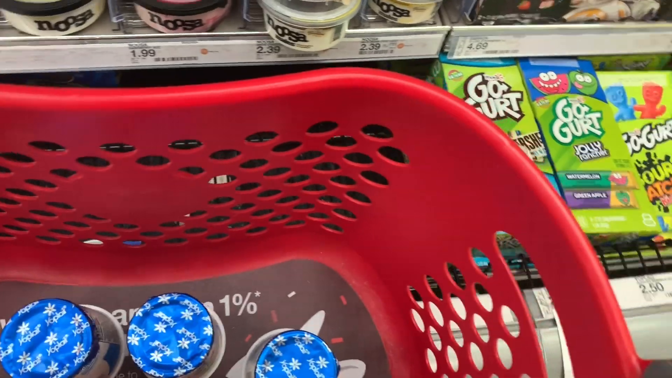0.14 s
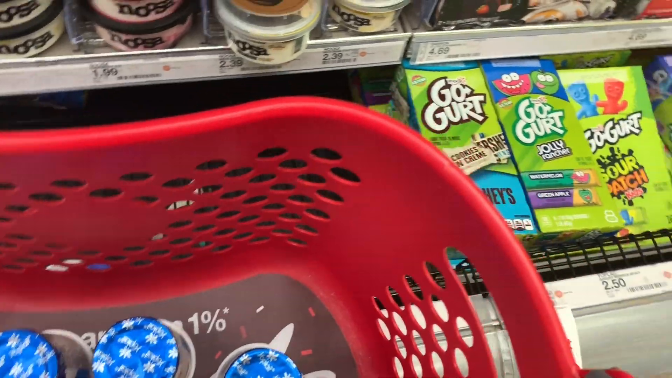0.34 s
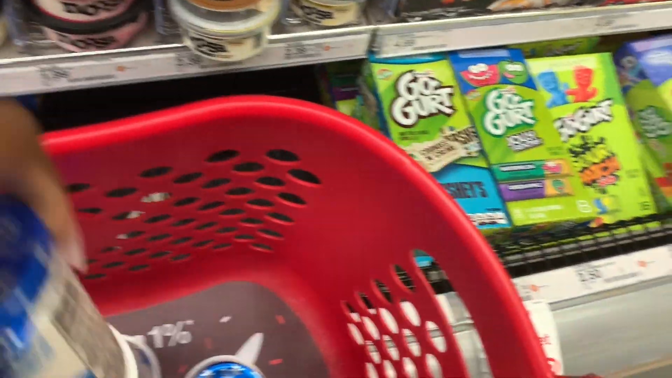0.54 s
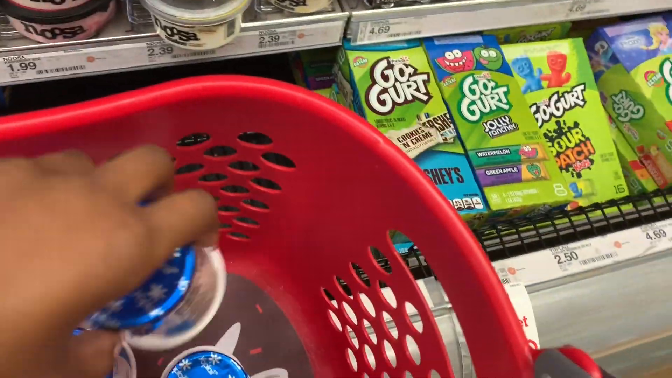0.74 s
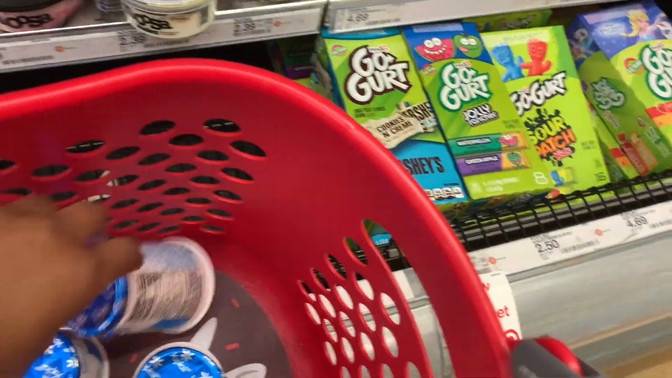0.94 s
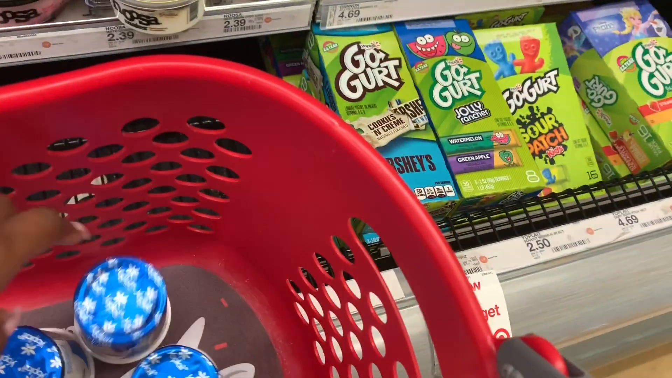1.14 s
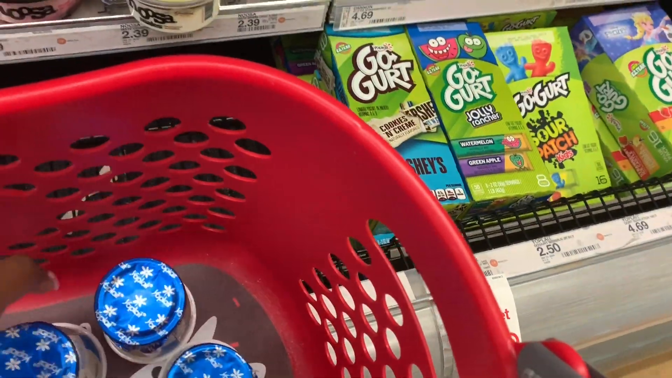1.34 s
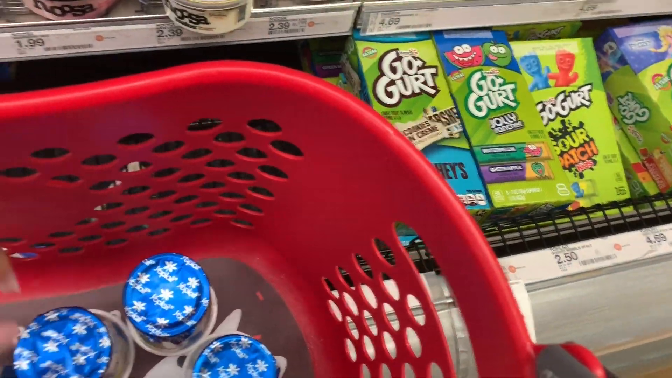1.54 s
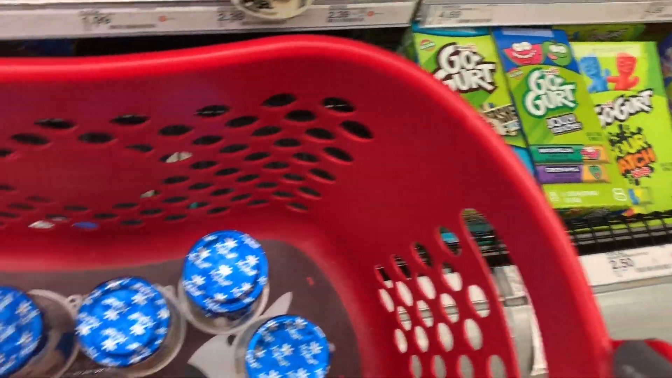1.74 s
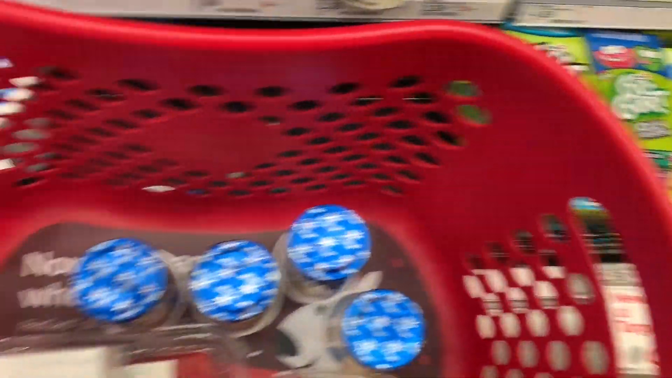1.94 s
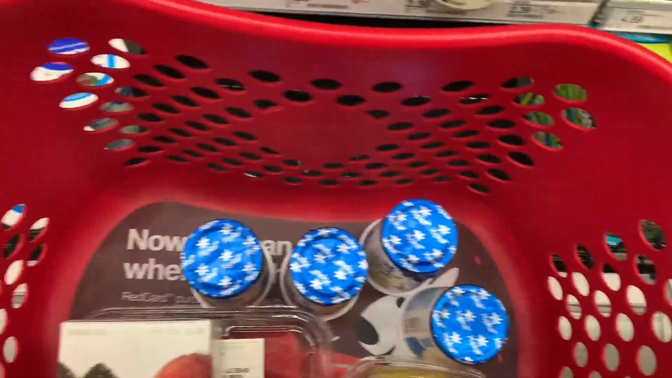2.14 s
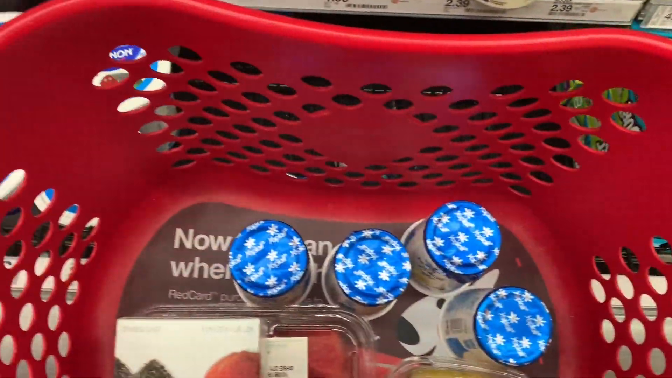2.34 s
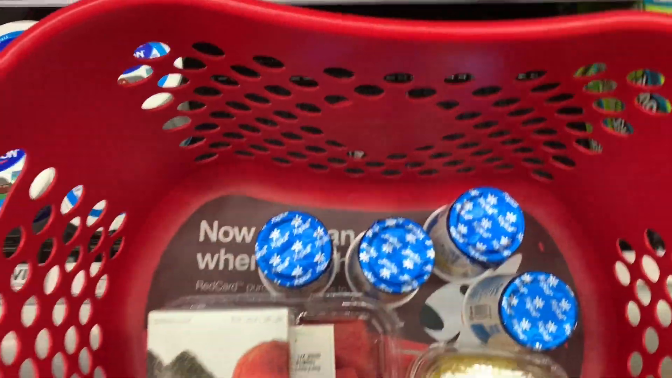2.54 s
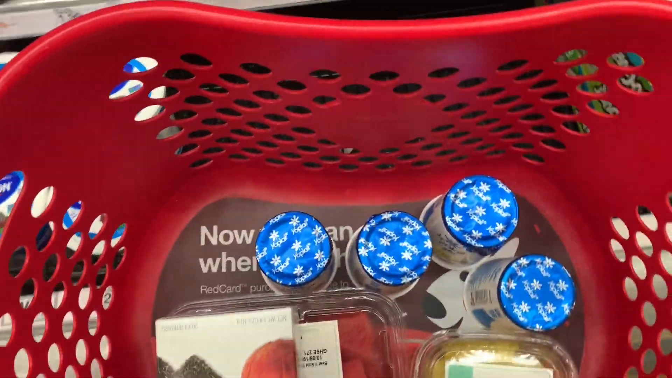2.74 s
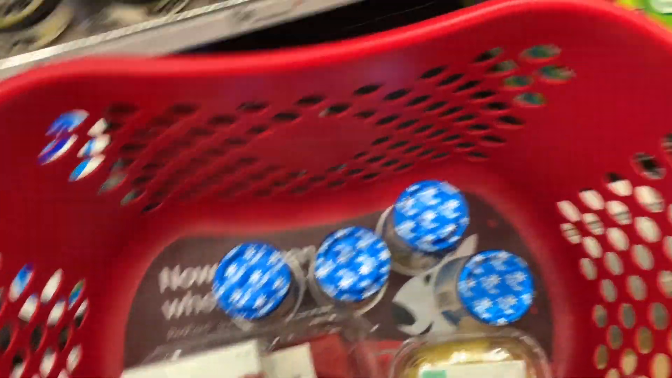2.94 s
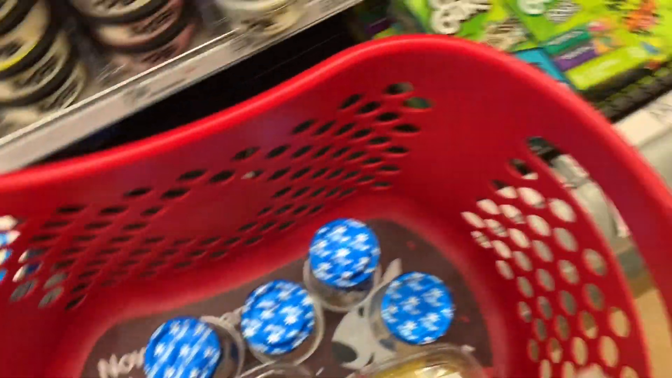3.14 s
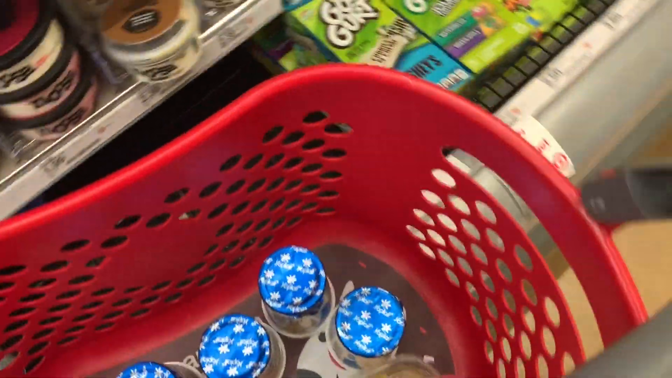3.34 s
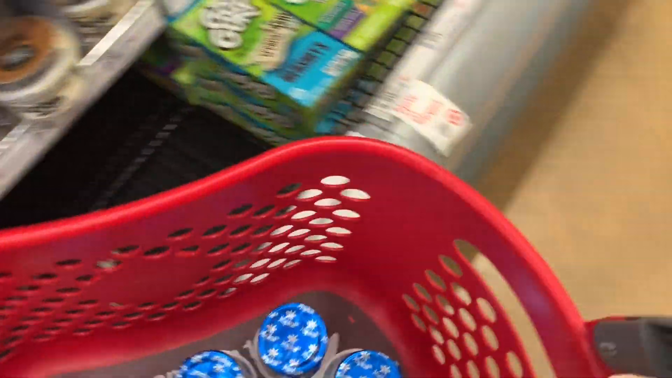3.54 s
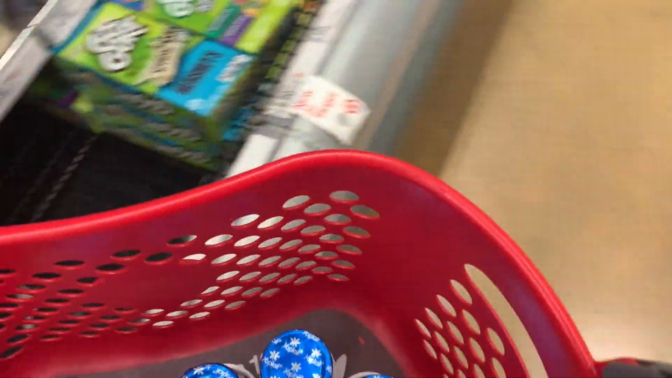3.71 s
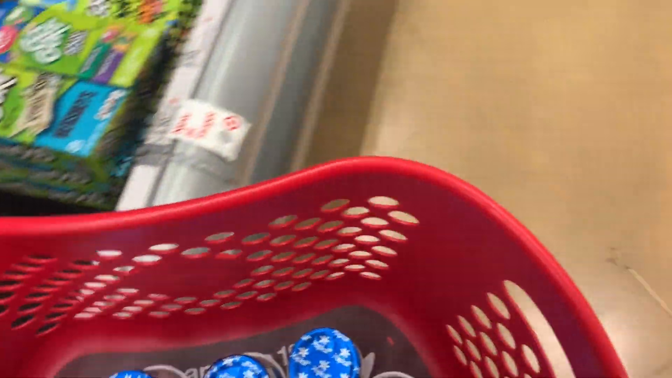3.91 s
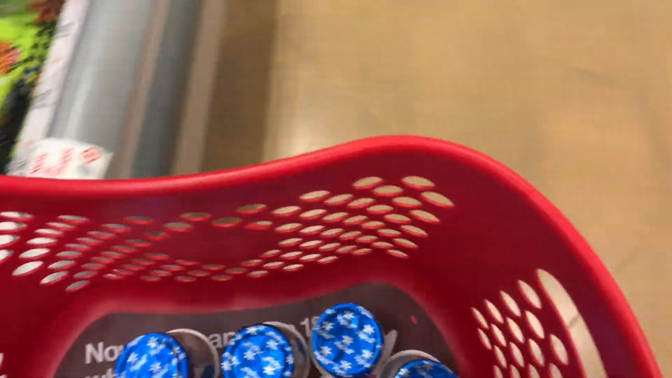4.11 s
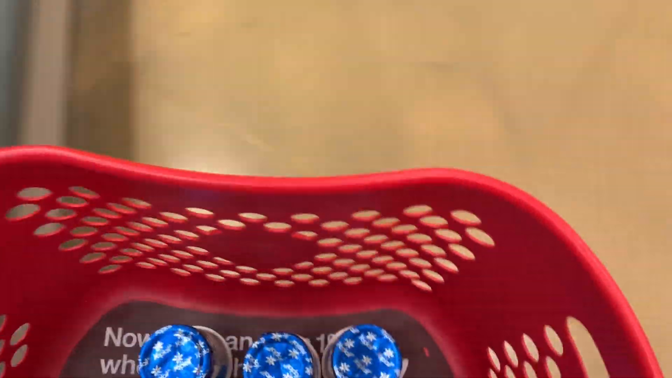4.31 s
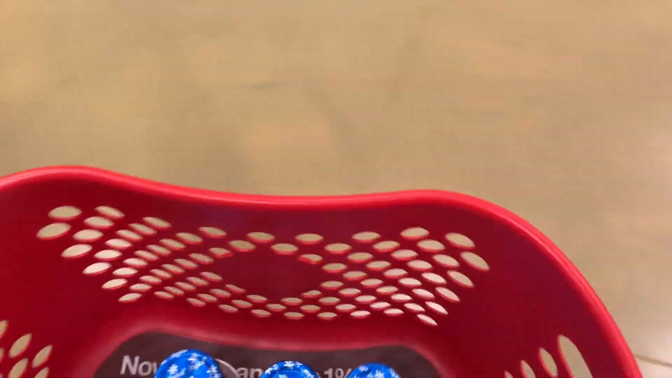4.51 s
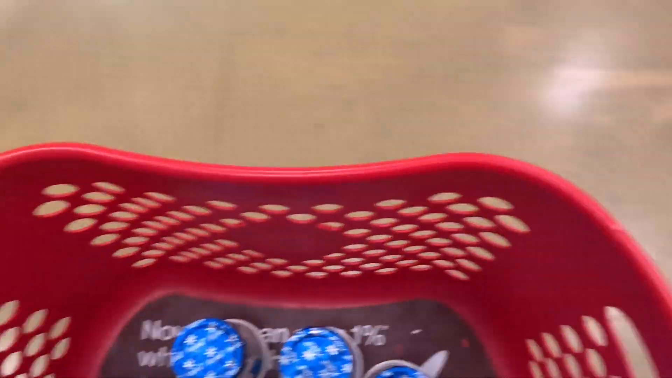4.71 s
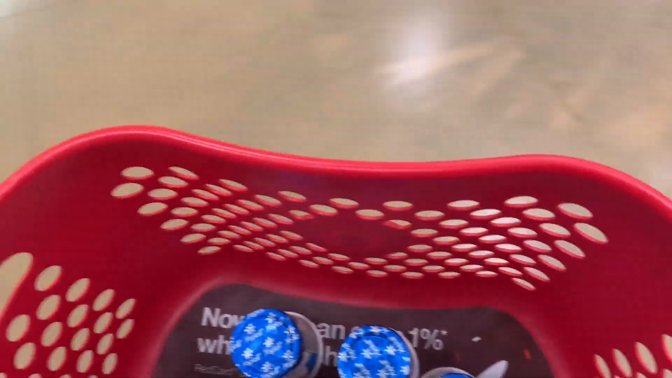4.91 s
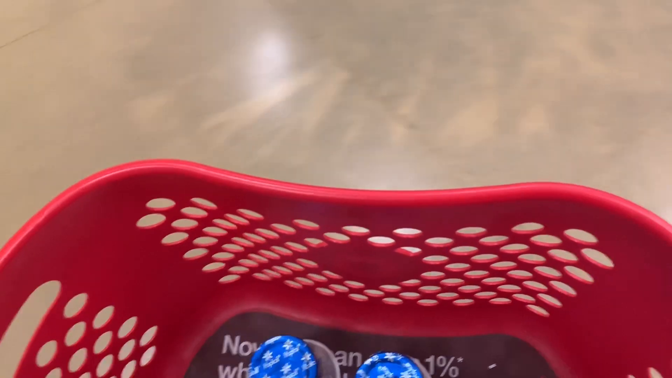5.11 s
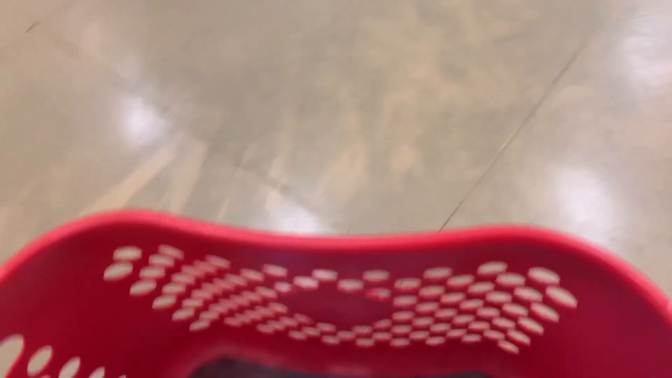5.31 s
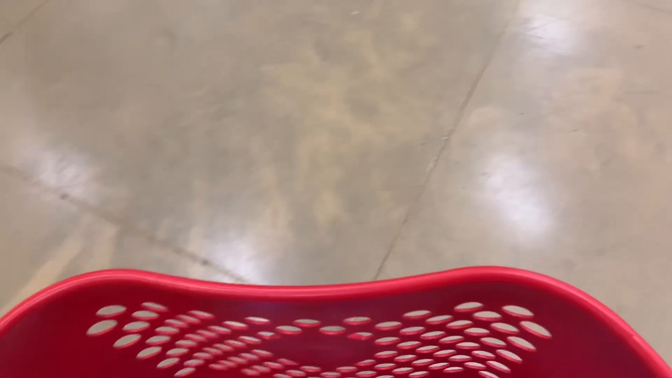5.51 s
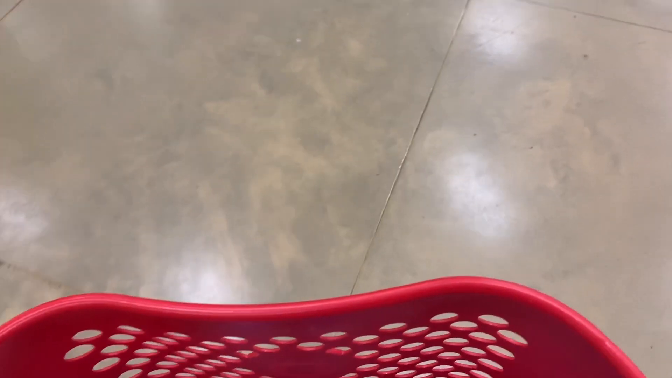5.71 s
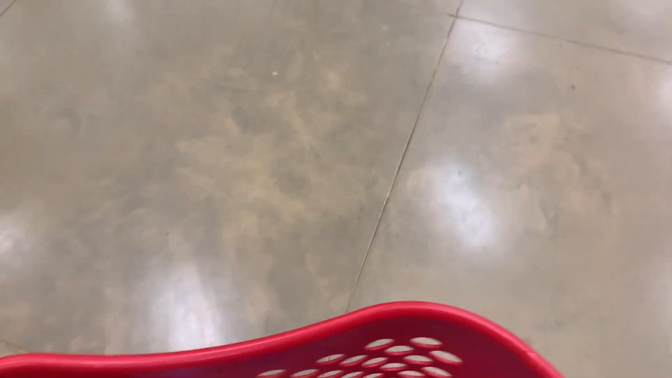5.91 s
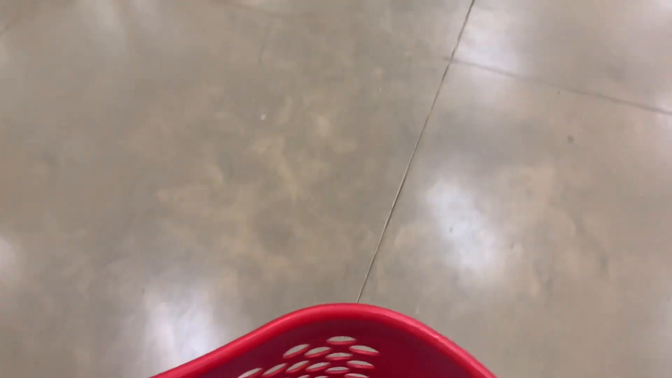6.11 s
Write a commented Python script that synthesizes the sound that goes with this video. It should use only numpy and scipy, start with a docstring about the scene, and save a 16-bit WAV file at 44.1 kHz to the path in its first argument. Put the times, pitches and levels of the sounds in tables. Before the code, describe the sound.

Thin plastic cups rustle and pop close by, then one lands in a plastic shopping basket with two sharp knocks and a brief rattle. Behind this runs the low hum and airy rush of a store's chilled shelves. After a pause, the basket's handle clacks several times and snaps into place. The drone gradually recedes, with a few light clicks, a soft scuff and faint far-off bustle at the end.

```python
"""Compressors hum and fans push air along the chilled shelves of a store, slightly louder in the right
channel. Close to the microphone, plastic cups rub, pop and crinkle in the hand; one is set down in a
plastic shopping basket, knocks twice and rattles against its neighbours. The basket is swung round, its
handle clacks and snaps in the pivots, and the refrigerators fall behind, uncovering the far bustle."""
import sys
import numpy as np
from scipy import signal
from scipy.fft import rfft, irfft, next_fast_len
from scipy.io import wavfile
from scipy.ndimage import uniform_filter1d, map_coordinates

SR = 44100
rng = np.random.default_rng(int(sys.argv[2]) if len(sys.argv) > 2 else 0)


def inscribe(sig):
    """Save sig as 16-bit PCM at rate SR to the path in sys.argv[1].

    A 1-D sig is mono; a 2-D sig holds one channel per row.
    Samples are clipped to [-1, 1] before scaling.
    """
    pcm = np.round(np.clip(np.atleast_2d(sig).T, -1, 1) * 32767)
    wavfile.write(sys.argv[1], SR, pcm.astype(np.int16))


N = 271646

# Mains hum, fan tone and cabinet drone along the aisle. Each row: time in seconds, relative level in dB.
MAINS_LEVEL = [(0, -47), (.8, -46), (1.2, -37), (2.0, -35), (2.8, -34), (3.5, -29), (3.8, -31), (4.3, -34),
               (4.6, -33), (5.2, -40), (6.16, -39)]
FAN_TONE_LEVEL = [(0, -31.5), (.6, -29), (1.85, -24.5), (2.6, -31.5), (2.95, -23), (3.33, -26),
                  (3.58, -20.5), (4.45, -35.5), (5.15, -35.5), (5.27, -26.5), (5.55, -33), (6.16, -19)]
DRONE_LEVEL = [(0, -23.5), (.9, -24.5), (1.85, -25), (2.75, -27.5), (3.25, -24), (4.5, -29), (5.3, -31.5),
               (6.16, -34.5)]
# The fans' rush along the aisle. Each row: time in seconds, relative duct and hiss levels in dB.
AIR_LEVELS = [(0, -30, -41.5), (1.4, -29, -41), (2.7, -29, -41), (3.5, -30.5, -41), (4.0, -32.5, -43),
              (4.6, -35, -44.5), (5.1, -37.5, -48), (6.16, -38.5, -48)]
# Cabinets, ducts, grilles, air hiss, building ventilation and far bustle, heard from the aisle.
# Each row: frequency in Hz, relative spectral level in dB.
DRONE_SPECTRUM = [(60, -120), (130, -35), (172, -10), (197, 0), (222, -6), (260, -16), (340, -40),
                  (700, -120)]
DUCT_SPECTRUM = [(90, -30), (150, -4), (245, 0), (310, -1), (350, -4), (400, -8), (460, -13), (530, -19),
                 (750, -40), (1500, -120)]
GRILLE_SPECTRUM = [(150, -120), (350, -12), (480, -1), (600, 0), (720, 1), (830, 0), (950, -9), (1100, -20),
                   (1500, -45), (3000, -120)]
HISS_SPECTRUM = [(500, -4), (1100, 0), (1650, 0), (2000, 1), (2400, -1), (2800, -6), (3300, -10.5),
                 (4100, -10), (4800, -16), (5800, -18), (7000, -19.5), (10500, -20), (12000, -26),
                 (13800, -22), (15200, -36)]
VENTILATION_SPECTRUM = [(10, -60), (25, -19), (35, -10), (45, -3), (75, -5), (90, 0), (110, 0), (150, -4),
                        (250, -25), (600, -120)]
BUSTLE_SPECTRUM = [(250, -26), (430, 4.5), (560, -1.5), (750, -20), (1000, -6), (1300, -12.5),
                   (1600, -21.5), (3000, -46)]
# How alike diffuse noise is at the two capsules. Each row: frequency in Hz, left-right correlation.
COHERENCE = [(60, 0.86), (150, 0.98), (380, 0.84), (950, 0.1), (2380, 0.011), (5980, 0.0067), (15000, 0.05)]

# Hand, cups and sleeve slide; lids crinkle; the load rattles; a far note and a scuff pass on the way out.
# Each row: start in seconds, length in seconds, relative level in dB.
RUBS = [(.21, 0.13, -46.5), (.385, 0.096, -49.5), (.585, 0.09, -49), (.76, 0.19, -54), (.85, 0.071, -39.5),
        (.99, 0.074, -41.5), (1.082, .04, -40), (2.415, 0.076, -46), (2.72, 0.17, -57), (3.42, 0.24, -45),
        (4.46, 0.35, -52.5), (5.275, 0.059, -52), (5.69, 0.15, -54), (5.91, 0.14, -58)]
CRINKLES = [(.352, 0.029, -37), (.708, 0.053, -40.5), (.843, 0.038, -30.5), (.872, 0.041, -36.5),
            (.916, 0.0089, -32), (1.082, 0.012, -27), (1.10, 0.019, -29)]
RATTLES = [(0.984, .07, -50), (1.182, .04, -41), (3.549, 0.04, -41)]
FAR_NOTE = [(5.63, 0.17, -33)]
SCUFFS = [(5.65, .11, -43.5)]
# Colour of the rubs and the scuff. Each row: frequency in Hz, relative spectral level in dB.
RUB_SPECTRUM = [(1500, -31), (3800, -2), (5500, -0.5), (7500, 1.5), (10000, 2.5), (13500, -8.5),
                (16000, -2)]
SCUFF_SPECTRUM = [(500, -14), (1500, -7), (2400, -9), (3500, -13), (9000, -16)]
# Cup rims scrape. Each row: start in seconds, length in seconds, level in dB, resonance in Hz.
RIM_SCRAPES = [(.878, .05, -44, 1500), (.884, .034, -33.5, 3550), (1.615, .055, -53, 4750),
               (5.695, .035, -47, 2050)]
# Close hits: cups pop, the basket is struck, its floor gives, thin plastic clicks, the handle catches.
# Each row: start in seconds, relative level in dB, centre frequency in Hz, 60 dB decay time in seconds.
CUP_POPS = [(0.3417, -34.5, 7100, 0.012), (0.3697, -29.5, 7640, 0.013), (0.369, -28, 9930, 0.0091),
            (.3792, -35, 12900, .01), (0.379, -34.5, 7000, .01), (1.1187, -24.5, 10000, .006),
            (1.129, -23, 6100, 0.012), (1.128, -28, 13600, 0.011)]
BASKET_KNOCKS = [(0.947, -28, 1400, 0.049), (0.9556, -10, 1190, 0.0095), (0.9585, -9.5, 373, 0.027),
                 (.965, -22, 650, 0.018), (.982, -29.5, 776, 0.12), (1.1238, -17.5, 1240, 0.027),
                 (1.128, -17, 440, 0.044), (1.152, -16, 1250, 0.009), (1.1522, -16, 410, 0.037),
                 (1.163, -25, 1130, 0.048), (3.4191, -11.5, 950, 0.016), (3.429, -26.5, 680, 0.1),
                 (3.464, -29, 1000, 0.054), (3.4705, -24.5, 825, .06), (3.532, -30.5, 704, 0.064),
                 (3.6224, -30, 1010, 0.082)]
FLOOR_THUMPS = [(.958, -14.5, 225, .045), (.962, -18, 90, .16), (1.128, -28, 95, .12)]
CUP_CLICKS = [(0.955, -20, 2300, 0.045), (.957, -27, 7540, 0.022), (0.97, -21, 9500, 0.033),
              (0.9711, -28, 2300, 0.073), (0.9795, -29, 5000, 0.016), (1.014, -34.5, 4000, 0.073),
              (1.0515, -38, 13000, 0.0054), (1.1234, -25, 2600, 0.059), (1.1423, -23, 8000, 0.008),
              (1.151, -21.5, 7900, 0.043), (1.161, -28, 8000, .035), (1.168, -29, 10000, 0.0092),
              (1.177, -28, 8450, 0.018), (1.2005, -27, 8750, 0.0063), (1.251, -33, 10200, 0.0032),
              (3.283, -46, 7000, .01), (3.338, -46, 7000, .01), (3.4203, -26, 1990, 0.015),
              (3.427, -34, 5000, 0.04), (3.432, -33, 9000, .015), (3.5465, -30, 10000, .012),
              (4.5115, -39, 9100, 0.0089), (4.611, -40.5, 6900, 0.018), (5.185, -44, 5000, 0.011),
              (5.293, -49, 7000, 0.0069), (5.299, -50, 7600, 0.012)]
HANDLE_CLACKS = [(3.523, -37, 3000, 0.026), (3.5292, -32.5, 4600, .016), (3.5324, -24.5, 4200, 0.026),
                 (3.567, -44, 5000, .012), (3.577, -32.5, 9100, 0.0054), (3.622, -25.5, 6000, .014),
                 (3.6249, -26, 4400, 0.027), (3.631, -32, 4800, 0.0079), (3.667, -43, 6040, 0.011)]
# The handle settles in its pivot. Each row: start in seconds, level in dB, tilt in dB per octave.
HANDLE_SNAPS = [(4.2, -28, 1.0), (4.2052, -25.3, -.7)]
# Modes of the basket walls, the hollow pivots and the handle.
# Each row: frequency in Hz, relative level in dB, free 60 dB decay time in seconds.
BASKET_MODES = [(389, 2, 0.058), (412, -1.5, 0.054), (554, 5.5, 0.08), (641, 0.5, 0.074), (730, 7.5, 0.036),
                (890, 10, 0.012), (980, 0.5, 0.021), (1116, -1, 0.022), (1210, -6.5, 0.048),
                (1540, 1, 0.024), (2110, 2.5, 0.029), (2376, 4, 0.04), (2680, 3, 0.023), (2850, 7, 0.025)]
PIVOT_MODES = [(1400, -10, .012), (2050, -6, 0.012), (2950, -9, 0.012), (3400, 0, .012), (3760, -2, 0.014),
               (4150, 0, 0.016), (5450, 0, 0.008), (6050, -1, .008), (6650, -1, 0.008), (8000, -4, .006),
               (9400, -1, 0.006)]
HANDLE_MODES = [(1222, -15, .03), (1600, -16, .02), (1790, -6, .014), (1880, 0, .021), (2020, -10, .014),
                (5350, -7, .012), (5588, -4, .013), (6050, -6, .011), (6487, -3, .012), (10400, -16, .016),
                (10850, -14, .016), (12850, -10, .02), (13150, -9, .024)]
# Resonances of the thin cup walls. Each row: centre in Hz, width in Hz, lift in dB.
CUP_RESONANCES = [(2370, 260, 3), (3440, 300, 5), (4050, 350, 5), (6050, 450, 6), (7900, 300, 1),
                  (9500, 500, 2)]
# Reverberation between the shelves. Each row: frequency in Hz, 60 dB decay time in seconds.
AISLE_DECAY = [(200, 0.1), (2000, 0.22), (12000, 0.079)]
# Uneven treble, with dips near 12 and 15 kHz. Each row: frequency in Hz, gain in dB.
TREBLE_COLOUR = [(7500, 0), (8600, -2), (10000, 2), (11000, 0), (12000, -9), (13200, 1), (14300, 0),
                 (15100, -12), (15700, -8), (16200, -16)]

QUICK_RISE, CRINKLE_RISE, GENTLE_RISE = 0.11, 0.5, 0.66  # share of a stroke spent rising


def amp(db):
    """Decibels to gain."""
    return 10 ** (np.asarray(db) / 20)


def unit(x):
    """Scale to rms 1."""
    return x / np.sqrt(np.mean(x ** 2) + 1e-20)


def along(points, hz):
    """Read (Hz, value) points on a log frequency axis."""
    f, v = np.transpose(points)
    return np.interp(np.log(hz + 1), np.log(f + 1), v)


def curves(rows):
    """One value per sample for each column after the time."""
    times, *columns = np.transpose(rows)
    return [np.interp(np.arange(N) / SR, times, column) for column in columns]


def wobble(rate):
    """A smooth random curve, rate knots a second."""
    return map_coordinates(rng.standard_normal(int(N * rate / SR) + 4), [np.arange(N) * rate / SR])


def filtered(x, response):
    """Filter x by a gain given as a function of frequency."""
    n = x.shape[-1]
    padded = next_fast_len(n + 8192)
    return irfft(rfft(x, padded) * response(np.fft.rfftfreq(padded, 1 / SR)), padded)[..., :n]


def band(x, hz, q):
    """Pass x through one resonance."""
    return filtered(x, lambda f: 1j * f * hz / q / (hz ** 2 - f * f + 1j * f * hz / q))


def off_centre(x, lag):
    """Sound from one side reaches one capsule lag seconds before the other."""
    return filtered(x, lambda hz: np.exp(1j * np.pi * hz * lag * np.array([[1], [-1]])))


def rush(spectrum):
    """Stereo noise of rms 1, nearly mono in the bass."""
    def mid_side_gain(hz):
        width = np.arccos(np.clip(along(COHERENCE, hz), -1, 1)) / 2
        return amp(along(spectrum, hz)) * [np.cos(width), np.sin(width)]
    mid, side = filtered(rng.standard_normal((2, N)), mid_side_gain)
    return unit(np.array([mid + side, mid - side]))


def patchy(x, depth_db=1.4):
    """Narrow bands of a noise swell and fade on their own."""
    bands = signal.stft(x, nperseg=1024)[2]
    swell = uniform_filter1d(rng.standard_normal(bands.shape[1:]), size=3, axis=0)
    swell = uniform_filter1d(swell, size=9, axis=1)
    return unit(signal.istft(bands * amp(depth_db * unit(swell)), nperseg=1024)[1][:, :N])


def strokes(rows, rise_share, sag_db=8, release_db=41):
    """Gain of strokes: each rises, sags by sag_db per length and, once over, by release_db more."""
    gain, t = np.zeros(N), np.arange(N) / SR
    for start, length, db in rows:
        progress = np.maximum(t - start, 0) / length
        fall_db = sag_db * progress + release_db * np.maximum(progress - 1, 0)
        gain += np.minimum(progress / rise_share, 1) * amp(db - fall_db)
    return gain


def attack(t, rise_s):
    """A soft onset with time constant rise_s."""
    return 1 - np.exp(-t / rise_s)


def burst(t, t60, alike):
    """Dying stereo noise; alike is the share of its power common to both sides."""
    common = np.sqrt(alike) * rng.standard_normal(len(t))
    separate = np.sqrt(1 - alike) * rng.standard_normal((2, len(t)))
    return (common + separate) * amp(-60 * t / t60)


def ring(modes, t, spread):
    """Damped modes at fresh strengths; high ones reach the two capsules out of step."""
    hz, db, t60 = np.transpose(modes)[:, :, None]
    skew = spread * rng.standard_normal(hz.shape) * np.minimum(hz / 1000, 2)
    fade = amp(db + rng.normal(0, 1.0, hz.shape) - 60 * t / t60)
    return np.sum(fade * np.sin(2 * np.pi * hz * t + np.array([skew, -skew])), axis=1)


def add_hit(track, start_s, db, sound):
    """Mix in a hit whose first 4 ms have the given level."""
    start = round(start_s * SR)
    head_rms = np.sqrt(np.mean(sound[:, :SR // 250] ** 2))
    track[:, start:start + sound.shape[1]] += amp(db) * sound[:, :N - start] / head_rms


def motor_tone(hz, drift_hz):
    """A motor whose speed wanders slightly."""
    return unit(np.sin(2 * np.pi * np.cumsum(hz + drift_hz * wobble(4)) / SR))


def fan_pair(hz, drift_hz, beat_s=1.133, null_s=2.69, weaker_db=-2):
    """Two fans at nearly the same speed: their sum swells and almost cancels once a beat."""
    phase = 2 * np.pi * np.cumsum(hz + drift_hz * wobble(3.95)) / SR
    phase += 0.2 * wobble(20)  # flutter in the draught
    apart = np.pi * (np.arange(N) / SR - null_s) / beat_s
    return unit(np.sin(phase + apart) - amp(weaker_db) * np.sin(phase - apart))


def compressors():
    """Mains hum and the beating tone of two fans, each with its octave; the draught shakes the fans."""
    duct_db = curves(AIR_LEVELS)[0]
    hum = amp(curves(MAINS_LEVEL)[0] - .5 + 1.2 * wobble(7)) * motor_tone(59.2, drift_hz=.8)
    hum_octave = amp(-39.5 + 2.5 * wobble(3)) * motor_tone(118.6, drift_hz=1.5)
    whirr = amp(curves(FAN_TONE_LEVEL)[0] + 1.6 * wobble(20)) * fan_pair(139.3, drift_hz=0.407)
    whirr_octave = amp(duct_db - 7 + 3.84 * wobble(2.88)) * motor_tone(278.5, drift_hz=1.33)
    return hum + hum_octave + whirr + whirr_octave


def moving_air():
    """Air throbs in cabinets, rumbles in ducts and hisses through grilles, over steady ventilation."""
    duct_db, hiss_db = curves(AIR_LEVELS)
    drone = amp(curves(DRONE_LEVEL)[0] + 0.91 * wobble(19)) * rush(DRONE_SPECTRUM)
    duct = amp(duct_db + 2.5 + 0.93 * wobble(5.69)) * rush(DUCT_SPECTRUM)
    grille = amp(duct_db - 7 + 1.3 * wobble(7.3)) * patchy(rush(GRILLE_SPECTRUM))
    hiss = amp(hiss_db - 4 + .8 * wobble(4)) * rush(HISS_SPECTRUM)
    return drone + duct + grille + hiss + amp(-32) * rush(VENTILATION_SPECTRUM)


def far_bustle():
    """The far side of the store comes and goes, uncovered as the refrigerators fall behind."""
    return amp(-46 + 3 * wobble(7.4)) * patchy(rush(BUSTLE_SPECTRUM))


def rubbing():
    """Close by, sliding plastic catches and lets go in tiny slips; a soft scuff comes on walking away."""
    slips = unit(amp(2.0 * wobble(70) + 4.2 * wobble(600)))
    slide = strokes(RUBS, QUICK_RISE) * rush(RUB_SPECTRUM)
    scuff = strokes(SCUFFS, GENTLE_RISE) * rush(SCUFF_SPECTRUM)
    return slips * (slide + scuff)


def cup_pops():
    """Under the grip, a patch of cup wall or lid flips over and rings briefly at its own pitch."""
    out, t = np.zeros((2, N)), np.arange(SR // 20) / SR
    for start, db, hz, t60 in CUP_POPS:
        patch = np.sin(2 * np.pi * hz * t) * amp(-60 * t / t60)
        crack = .9 * band(burst(t, t60, alike=0.97), hz, q=0.93)
        pop = (patch + crack) * attack(t, 0.00039)
        add_hit(out, start, db, off_centre(pop, lag=rng.normal(0, 0.32) / hz))
    return out


def lid_crinkle(buckles_per_s=3500, centre_hz=11200, spread_octaves=.33, t60=.005, scatter_db=2.5):
    """Foil lids crinkle under the fingers: a swarm of tiny buckles, each with its own pitch."""
    count, t = int(buckles_per_s * N / SR), np.arange(int(t60 * SR)) / SR
    pitch, size, skew = rng.standard_normal((count, 3)).T[:, :, None]
    samples = (rng.integers(N, size=(count, 1)) + np.arange(len(t))).ravel()
    hz = np.minimum(centre_hz * 2 ** (spread_octaves * pitch), SR / 2)
    fade = amp(scatter_db * size - 60 * t / t60)
    sides = []
    for side in (1, -1):
        buckles = fade * np.sin(2 * np.pi * hz * t + side * skew)
        sides.append(np.bincount(samples, buckles.ravel(), N)[:N])
    return strokes(CRINKLES, CRINKLE_RISE) * unit(np.array(sides))


def rim_scrapes(grit_db=4.5, q=2.6):
    """Cup rims scrape across their neighbours; the uneven slips drive a resonance of the rim."""
    grit = amp(grit_db * wobble(400)) * rng.standard_normal((2, N))
    return sum(strokes([(start, length, db)], QUICK_RISE) * unit(band(band(grit, hz, q), hz, q))
               for start, length, db, hz in RIM_SCRAPES)


def basket_knocks():
    """Blows ring the walls, where they land picks the modes, and the floor gives under the load."""
    out, t = np.zeros((2, N)), np.arange(SR // 5) / SR
    for start, db, hz, t60 in BASKET_KNOCKS:
        walls = ring(BASKET_MODES, t, spread=0.18) * amp(-30 * t / t60)  # the load damps them
        contact = 1.4 * burst(t, t60, alike=1.0)
        blow = (walls + contact) * attack(t, 0.0012)
        add_hit(out, start, db, band(band(blow, hz, q=1.68), hz, q=0.19))
    for start, db, hz, t60 in FLOOR_THUMPS:
        thump = np.sin(2 * np.pi * hz * t) * amp(-60 * t / t60) * attack(t, 0.00046)
        add_hit(out, start, db, thump[None])
    return off_centre(out, lag=0.00017)


def cup_clicks():
    """Thin cup walls and lids give short cracks, coloured by the cups; longer ones build up slower."""
    def cup_colour(hz):
        return amp(sum(db / (1 + (2 * (hz - centre) / width) ** 2)
                       for centre, width, db in CUP_RESONANCES))
    out, t = np.zeros((2, N)), np.arange(SR // 6) / SR
    for start, db, hz, t60 in CUP_CLICKS + rattle_ticks():
        crack = burst(t, t60, alike=.5) * attack(t, .035 * t60)
        click = band(band(crack, hz, q=0.55), hz, q=0.17)
        add_hit(out, start, db - 3, off_centre(click, lag=rng.normal(0, 0.000247)))
    return filtered(out, cup_colour)


def rattle_ticks(ticks_per_s=75, centre_hz=7800, t60=0.016, scatter_db=8):
    """The load rattles after each jolt: small ticks at uneven moments, as rows like CUP_CLICKS."""
    rows = []
    for start, length, db in RATTLES:
        count = max(round(length * ticks_per_s), 1)
        for k, (late, size, pitch) in enumerate(rng.uniform(-1, 1, (count, 3))):
            when = start + length * (k + .5 + late / 2) / count
            rows.append((when, db + scatter_db * size, centre_hz * 2 ** (pitch / 2), t60))
    return rows


def handle_clacks():
    """The handle slips as the basket swings: each catch grates briefly and rings the hollow pivots."""
    out, t = np.zeros((2, N)), np.arange(SR // 10) / SR
    for start, db, hz, t60 in HANDLE_CLACKS:
        slip = burst(t, t60, alike=0.52) * attack(t, .0008)
        hollow = signal.fftconvolve(slip, ring(PIVOT_MODES, t, spread=0.37), axes=1)[:, :len(t)]
        add_hit(out, start, db, band(unit(hollow) + .9 * unit(slip), hz, q=0.7))
    return out


def handle_snaps():
    """The loose handle slides home with a dry snap and buzzes on, a little louder on the right."""
    out, t = np.zeros((2, N)), np.arange(SR // 4) / SR
    for start, db, tilt in HANDLE_SNAPS:
        modes = [(hz, level + tilt * np.log2(hz / 4000), t60) for hz, level, t60 in HANDLE_MODES]
        crack = 0.65 * band(burst(t, t60=0.018, alike=0.32), 3500, q=.6)
        loose = burst(t, t60=.11, alike=.3)
        buzz = amp(-13) * (band(loose, 15000, q=14) + band(loose, 10800, q=16))
        add_hit(out, start, db, (ring(modes, t, spread=0.95) + crack + buzz) * attack(t, .0007))
    return out * amp([[-1.2], [1.2]])


def far_note(end_hz=495, fall_hz=85, fall_s=.12, scatter=.4):
    """A soft note in the bustle sinks and settles, part of it scattered by the hall."""
    age = np.maximum(np.arange(N) / SR - FAR_NOTE[0][0], 0)
    phase = 2 * np.pi * np.cumsum(end_hz + fall_hz * np.exp(-age / fall_s)) / SR
    blur = 1 + scatter * (wobble(24) + 1j * wobble(24))
    return strokes(FAR_NOTE, GENTLE_RISE) * unit(np.real(blur * np.exp(1j * phase)))


def aisle_reverb(x):
    """Shelves and floor answer with a short, diffuse tail."""
    hz, t, noise = signal.stft(rng.standard_normal((2, SR // 2)), SR, nperseg=256)
    decay = amp(-60 * t / along(AISLE_DECAY, hz)[:, None])
    tail = signal.istft(noise * decay, SR, nperseg=256)[1]
    return signal.fftconvolve(x, tail / np.linalg.norm(tail[0]), axes=1)[:, :N]


def scene():
    """The basket close to the microphone; the store's hum and air slightly louder in the right channel."""
    basket = basket_knocks() + cup_clicks() + cup_pops() + rubbing() + rim_scrapes() + lid_crinkle()
    handle = handle_clacks() + handle_snaps()
    store = compressors() + moving_air() + far_bustle() + far_note()
    reverb = aisle_reverb(amp(-9) * basket + amp(-17) * handle)  # the handle is nearest, so driest
    return basket + handle + reverb + store * amp([[-.55], [.55]])


def record(dry, top_hz=16300):
    """The treble is uneven; the recorder rounds off peaks and keeps nothing above top_hz."""
    heard = filtered(dry, lambda hz: amp(along(TREBLE_COLOUR, hz)))
    rounded = heard / (1 + np.abs(heard) ** 8) ** (1 / 8)
    return filtered(rounded, lambda hz: hz < top_hz)


dry = scene()
out = record(dry)
inscribe(out)
```